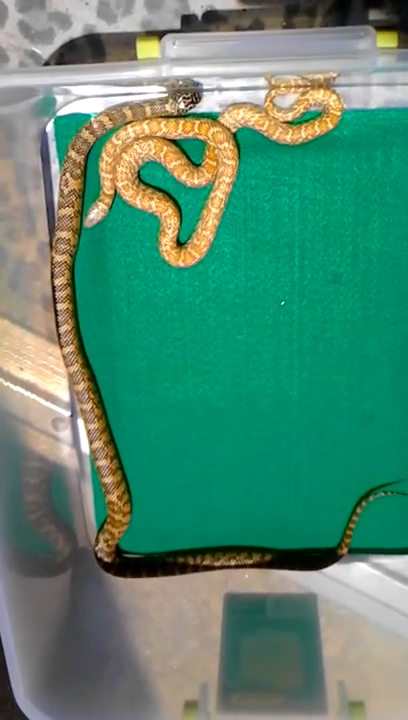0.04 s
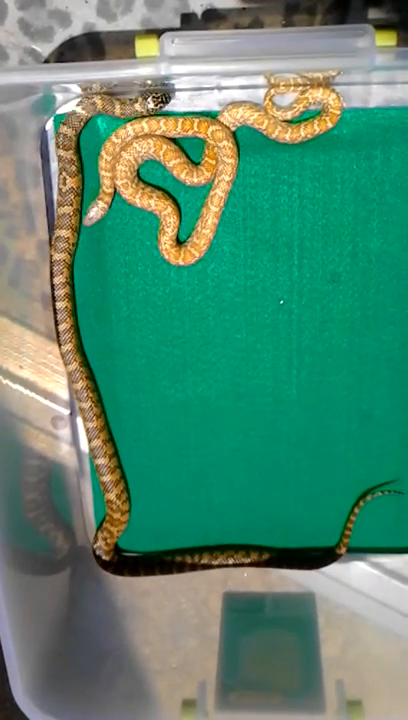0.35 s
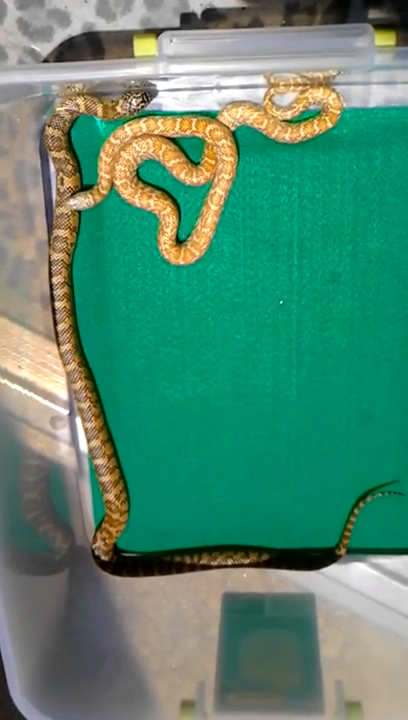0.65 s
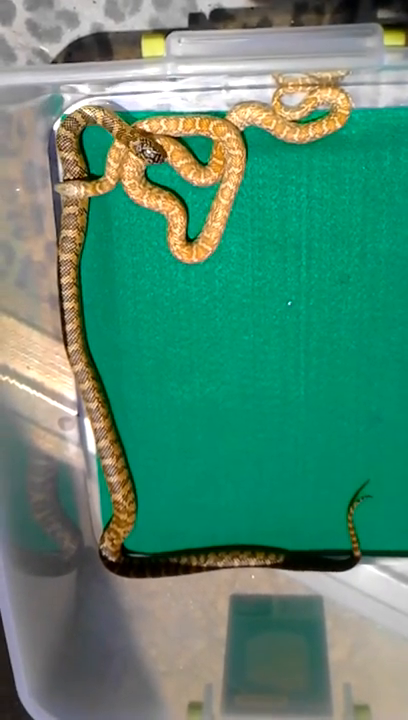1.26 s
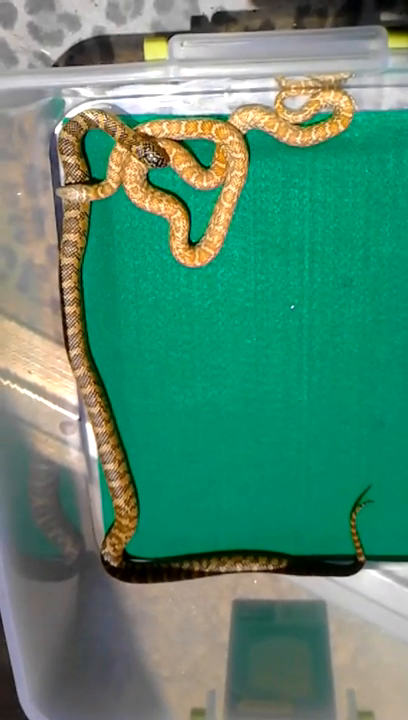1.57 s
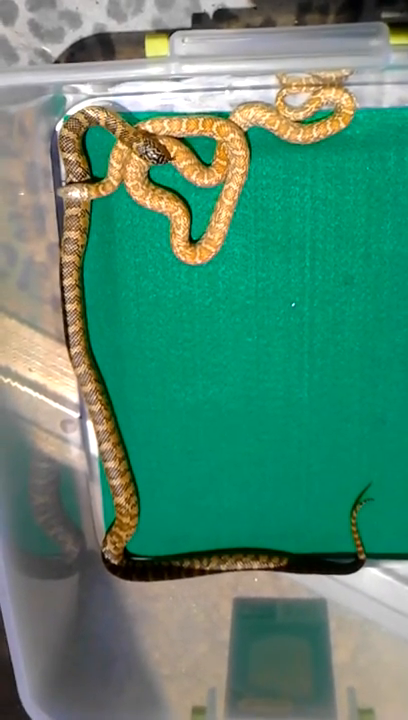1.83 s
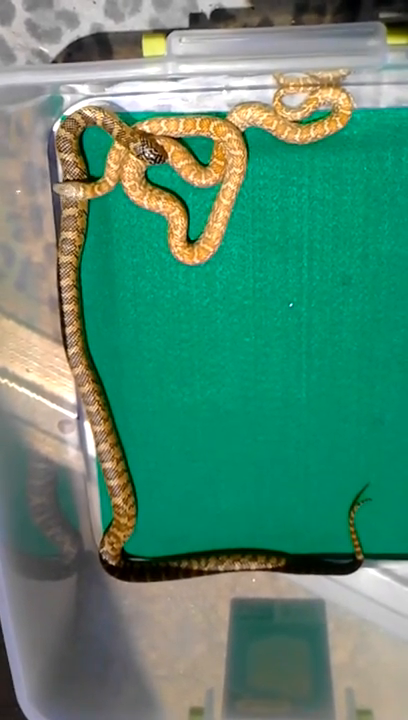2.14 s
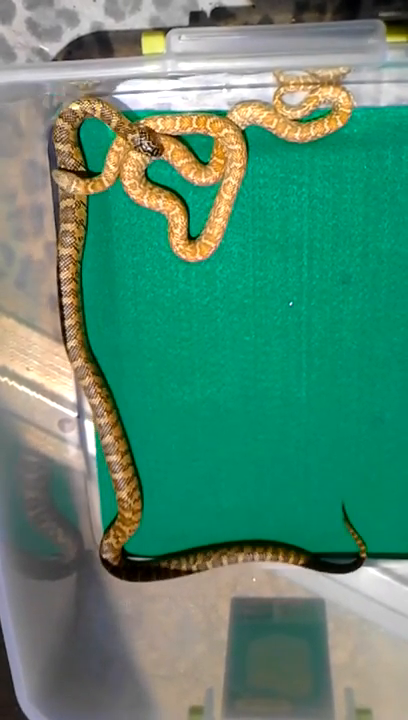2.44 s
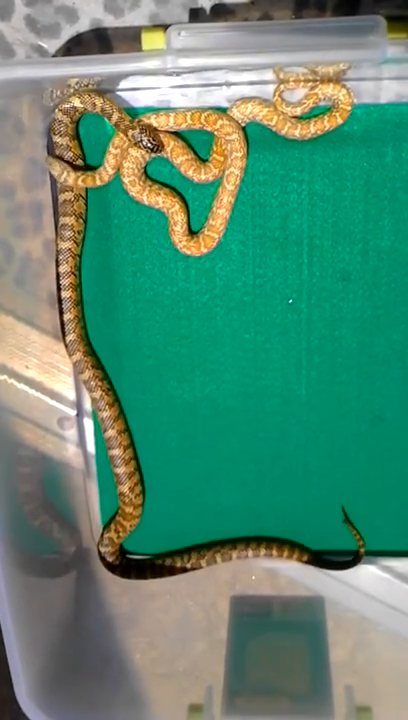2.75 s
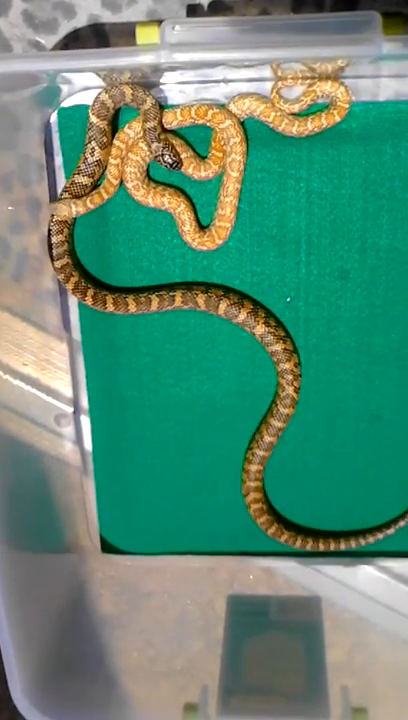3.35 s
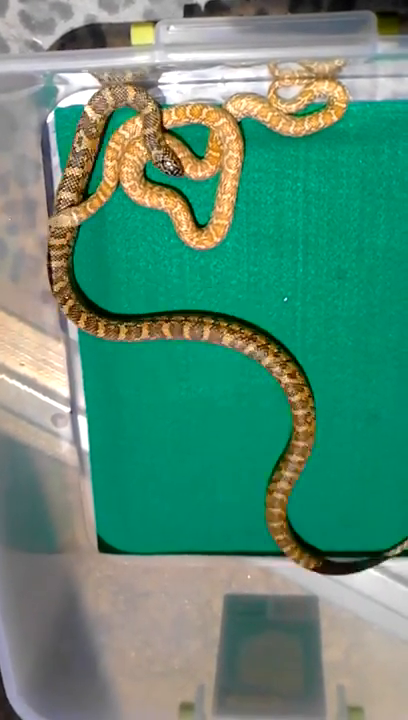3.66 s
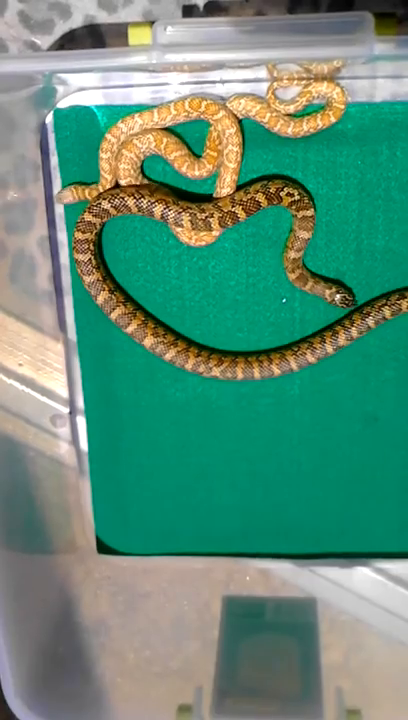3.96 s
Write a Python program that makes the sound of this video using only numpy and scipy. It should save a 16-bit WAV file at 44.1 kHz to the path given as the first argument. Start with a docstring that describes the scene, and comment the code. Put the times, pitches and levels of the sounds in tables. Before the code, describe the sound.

A snake's tail buzzing against a plastic tub is the main sound. For the first two seconds there is only a thin, pulsing, insect-like hiss with faint high chirps, over low motor hum and room noise. Scales slide faintly around 2 seconds, and uneven light slaps follow. From 2.5 seconds the tail keeps up a fast, dry buzz, with one dull knock on the tub at about 3.9 seconds.

```python
"""Snake buzzing its tail in a tub

One microphone by a plastic tub in a quiet room. Scales slide, a few uneven slaps follow, then the tail
tip slaps and scrapes the plastic some 58 times a second, a dry buzz. Near the end the snake knocks
against the tub once. Behind it are a thin, pulsing, insect-like hiss with faint high chirps,
a low motor hum, room noise and a slight electronic whine."""
import sys
import numpy as np
from scipy import signal
from scipy.fft import rfft, irfft
from scipy.io import wavfile

SR = 44100
rng = np.random.default_rng(int(sys.argv[2]) if len(sys.argv) > 2 else 0)


def transcribe(signal):
    """Save signal, clipped to [-1, 1], as a 16-bit WAV file at the path in sys.argv[1]."""
    frames = np.atleast_2d(signal).T
    limited = np.clip(frames, -1, 1)
    pcm = np.round(limited * 32767).astype(np.int16)
    wavfile.write(sys.argv[1], SR, pcm)


N = 176400

# first uneven slaps, before the tail finds its rhythm: start_s, level_db
FIRST_SLAPS = [(2.216, -81), (2.235, -68), (2.247, -65.5), (2.256, -74.5), (2.267, -65.5), (2.287, -66),
               (2.299, -68.5), (2.311, -70), (2.3379, -63.5), (2.348, -64), (2.3677, -65.5), (2.381, -66.5),
               (2.3995, -66), (2.411, -70), (2.426, -70), (2.44, -73), (2.4531, -65), (2.471, -65.5)]
# speed of the tail: time_s, beats_per_s
BEAT_RATE = [(2.49, 57.3), (2.68, 57.25), (2.8, 57.62), (3.27, 57.88), (3.36, 58.9), (3.47, 57.6),
             (3.65, 57.96)]
# force of the steady beats on the plastic: time_s, level_db
BEAT_FORCE = [(2.49, -63.5), (2.51, -64), (2.53, -67), (2.56, -66.5), (2.7, -65.5), (3.04, -65.5),
              (3.066, -69), (3.083, -68), (3.11, -65), (3.2, -66), (3.36, -66), (3.385, -69.5), (3.47, -71),
              (3.56, -68.5), (3.9, -69), (3.95, -68.5)]
# contacts within one beat: delay_s, relative_db, decay_s, accent_hz
BEAT_CONTACTS = [(0.0, 0, .0012, 3800), (.0034, -1.5, .0012, 4000), (.0054, 0, .0017, 5700),
                 (.0082, -3.5, .003, 2400)]
# resonances of the tub: pitch_hz, width_hz, relative_db
TUB_MODES = [(404, 14, 5), (570, 50, 8.5), (640, 50, 1), (877, 40, -1), (1095, 55, 0), (1588, 50, -2.5),
             (2196, 50, 4), (2449, 55, 3.5), (2955, 20, -2.5), (3127, 25, -1), (3655, 30, -2),
             (3768, 25, 3), (3940, 20, 1.5), (4172, 20, -.5), (4338, 30, -.5), (4818, 22, -2),
             (5178, 70, -1), (5474, 90, -1), (5700, 35, 4), (6971, 120, -4), (7920, 90, -2), (8134, 60, -3),
             (8301, 70, -2)]
# colour of the scrape: frequency_hz, relative_db
SCRAPE_COLOUR = [(200, -3), (400, 3), (560, -2), (1100, 1), (1450, 1), (2300, -3), (2650, -4), (3300, -2.5),
                 (4100, 0), (4750, -6), (5300, -1), (6900, 0.5), (7550, -9), (8200, 1), (9200, -5.5),
                 (10400, -7.5), (11500, -16), (15000, -42)]
def tail_buzz(buzz_start_s=2.4921):
    """In front: each beat is a few short scrapes, partly alike every time, that ring the tub."""
    beat_spread_db, contact_spread_db, jitter_s = .6, .65, .00008
    friction_db, rub_into_tub_db, accent_db = -11, 2, -.5
    scrape_db, ring_db = -.5, -.8
    t = seconds()
    rate = in_time(BEAT_RATE)
    cycles = np.cumsum(rate * (t > buzz_start_s)) / SR
    steady_s = t[1:][np.diff(np.ceil(cycles)) > 0]
    steady_db = np.interp(steady_s, *np.transpose(BEAT_FORCE))
    steady_db += beat_spread_db * rng.standard_normal(len(steady_s))
    beat_s, beat_db = np.hstack([np.transpose(FIRST_SLAPS), [steady_s, steady_db]])
    rubbing, scrapes = np.zeros((2, N))
    for delay_s, db, decay_s, accent_hz in BEAT_CONTACTS:
        late, strong = rng.standard_normal((len(beat_s), 2)).T
        onsets = ((beat_s + delay_s + jitter_s * late) * SR).astype(int)
        touches = np.bincount(onsets, from_db(db + beat_db + contact_spread_db * strong), N)[:N]
        fade = np.exp(-t[:SR // 20] / decay_s)
        alike = signal.fftconvolve(touches, scuff(decay_s), "same")
        fresh = signal.fftconvolve(touches, fade / np.linalg.norm(fade))[:N] * rng.standard_normal(N)
        contact = alike + from_db(friction_db) * fresh
        rubbing += touches + from_db(rub_into_tub_db) * fresh
        scrapes += contact + from_db(accent_db) * resonate(contact, accent_hz, width_hz=1700)
    ringing = sum((-1) ** k * from_db(db) * resonate(rubbing, hz, width_hz)
                  for k, (hz, width_hz, db) in enumerate(TUB_MODES))
    scrape = tub_walls(coloured(scrapes, SCRAPE_COLOUR))
    level = np.sqrt(np.sum(from_db(beat_db) ** 2) / np.sum(rate / SR))
    return level * (from_db(scrape_db) * scrape + from_db(ring_db) * rms_one(ringing))


def scuff(decay_s):
    """One short scrape of unit energy and flat spectrum, starting in the middle of the array."""
    age = np.arange(-SR // 20, SR // 20) / SR
    burst = (age >= 0) * np.exp(-np.abs(age) / decay_s) * rng.standard_normal(len(age))
    phase = np.angle(rfft(burst))
    return irfft(np.exp(1j * phase), len(age))


def tub_walls(x, echo_db=-7, t60_s=.06):
    """Add dense, quickly dying reflections between the walls of the tub; rms 1."""
    t = seconds()[:SR // 4]
    echoes = rng.standard_normal(len(t)) * from_db(-60 * t / t60_s)
    reflected = signal.fftconvolve(x, echoes / np.linalg.norm(echoes))[:N]
    return rms_one(x + from_db(echo_db) * reflected)


# what rings when the tub is knocked: pitch_hz, relative_db, t60_s
BUMP_MODES = [(314, -10, 0.041), (572, -11, 0.055), (696, 0.5, 0.03), (1010, -7, 0.018),
              (1370, -8.5, 0.034), (1980, -23, 0.029)]
def knock(bump_s=3.9325, bump_db=-46, tick_s=3.9465, tick_db=-52.5, tick_decay_s=.0012):
    """At the tub wall: a dull bump on the plastic, then a tiny bright tick."""
    age = np.maximum(seconds() - bump_s, 0)
    bump = sum(from_db(bump_db + db - 60 * age / t60_s) * np.sin(2 * np.pi * hz * age)
               for hz, db, t60_s in BUMP_MODES)
    age = seconds() - tick_s
    tick = from_db(tick_db) * (age > 0) * np.exp(-np.abs(age) / tick_decay_s) * rng.standard_normal(N)
    highpass = signal.butter(2, 3500, "high", fs=SR, output="sos")
    return bump + signal.sosfilt(highpass, tick + 1e-18)


# swell of the sliding scales: time_s, level_db
SCALES_LEVEL = [(1.8, -110), (1.9, -84.5), (2.2, -80), (2.3, -110)]
# their colour: frequency_hz, relative_db
SCALES_COLOUR = [(1200, -7.5), (1750, 3), (2300, -12.5), (2750, -5.5), (3500, -15), (5000, -39)]
def sliding_scales(grain_db=2):
    """Inside the tub: scales rub faintly and unevenly on the plastic just before the buzz."""
    rub = rng.standard_normal(N) * from_db(grain_db * drift(rate_hz=60))
    return from_db(in_time(SCALES_LEVEL)) * coloured(rub, SCALES_COLOUR)


# spurts of the thin hiss: centre_s, length_s, level_db
HISS_SPURTS = [(0.029, 0.023, -70), (.057, 0.013, -71.5), (.095, .02, -78), (0.133, .025, -72),
               (0.178, 0.026, -72), (.228, 0.061, -74.5), (.287, 0.018, -73), (0.325, 0.016, -72),
               (0.373, .038, -71.5), (0.407, .02, -72), (.46, 0.061, -72.5), (0.533, .052, -74),
               (0.606, 0.058, -73.5), (0.695, 0.12, -74.5), (0.78, 0.017, -79), (0.796, 0.016, -75),
               (0.821, 0.017, -72), (0.855, .03, -74), (.893, 0.037, -75), (0.956, 0.058, -73.5),
               (1.006, 0.025, -74), (1.047, 0.01, -70.5), (1.081, 0.017, -73.5), (1.121, 0.013, -73),
               (1.158, 0.01, -73), (1.201, .025, -74.5), (1.248, .025, -78), (1.32, 0.02, -73),
               (1.437, 0.028, -80), (1.485, .03, -78), (1.643, 0.017, -76), (1.697, .014, -75),
               (1.75, 0.016, -77), (1.802, 0.013, -75), (1.881, 0.015, -73.5), (1.936, 0.06, -73.5),
               (2.003, 0.017, -70.5), (2.044, 0.016, -69), (2.112, 0.11, -74), (2.189, 0.028, -73)]
# its colour: frequency_hz, relative_db
HISS_COLOUR = [(4300, -30), (5000, -11), (5650, 1.5), (6750, 3.5), (7200, -1), (7800, -27.5), (10000, -19),
               (13000, -51)]
def pulsing_hiss(ramp_s=.006, bed_db=-80, flicker_db=1.2):
    """Behind the snake: a narrow insect-like hiss in uneven, flat-topped spurts over a faint bed."""
    t = seconds()
    spurts = sum(from_db(db) * np.clip(.5 + (length_s / 2 - np.abs(t - centre_s)) / ramp_s, 0, 1)
                 for centre_s, length_s, db in HISS_SPURTS)
    flicker = from_db(flicker_db * drift(rate_hz=55))
    level = np.hypot(spurts, from_db(bed_db)) * flicker
    return level * coloured(rng.standard_normal(N), HISS_COLOUR)


# faint high chirps: centre_s, level_db
CHIRP_PIPS = [(.076, -82), (.116, -87), (.233, -79), (.352, -80), (.457, -76), (.5, -74), (.575, -74),
              (.726, -82), (1.03, -75.5), (1.107, -85), (1.338, -73), (1.485, -72), (1.525, -84),
              (1.566, -81), (1.598, -82), (1.639, -80), (1.676, -81), (1.716, -81), (1.787, -75),
              (1.827, -76), (1.865, -76), (2.168, -73)]
def chirps(pitch_hz=8920, wander_hz=100, width_s=.007):
    """In the background: short, soft-edged pips of one unsteady high tone."""
    t = seconds()
    swell = sum(from_db(db) * np.exp(-.5 * ((t - centre_s) / width_s) ** 2)
                for centre_s, db in CHIRP_PIPS)
    hz = pitch_hz + wander_hz * drift(rate_hz=110)
    return swell * np.sin(2 * np.pi * np.cumsum(hz) / SR)


# motor hum: pitch_hz, level_db
MOTOR_TONES = [(58.7, -55), (117.4, -73)]
# electronic whine: pitch_hz, level_db
WHINE_TONES = [(5000, -94.5), (6000, -86), (8000, -89.5), (10000, -86.5), (11000, -99), (12000, -93),
               (14000, -103)]
def hum_and_whine():
    """Steady tones in the background: a motor low down, electronics high up."""
    return sum(np.sqrt(2) * from_db(db) * np.sin(2 * np.pi * (hz * seconds() + rng.random()))
               for hz, db in MOTOR_TONES + WHINE_TONES)


# colour of the room noise: frequency_hz, relative_db
ROOM_COLOUR = [(20, -1), (45, -0.5), (75, -7), (105, -8), (150, -14), (230, -23.5), (420, -27.5),
               (650, -23.5), (1050, -28), (1500, -40.5), (2200, -47.5), (4200, -51.5), (8000, -52)]
# colour of the smooth high hiss: frequency_hz, relative_db
HIGH_HISS_COLOUR = [(4400, -23), (5200, -3), (6500, -11.5), (7700, -6), (9100, -3), (9700, 0.5), (10600, 1),
                    (11400, -9), (12100, -1.5), (13000, -7), (14000, -9), (15000, -26)]
# its slow rise and fall: time_s, level_db
HIGH_HISS_LEVEL = [(0, -76.5), (1.25, -77.5), (1.4, -76), (2.6, -76), (3.0, -80), (3.4, -75.5), (4, -77.5)]
def room_tone(room_db=-57):
    """The room around the microphone: quiet low noise under a smooth high hiss."""
    low, high = rng.standard_normal((2, N))
    hiss = from_db(in_time(HIGH_HISS_LEVEL)) * coloured(high, HIGH_HISS_COLOUR)
    return from_db(room_db) * coloured(low, ROOM_COLOUR) + hiss


def from_db(db):
    """Decibels to gain."""
    return 10 ** (np.asarray(db) / 20)


def rms_one(x):
    """Scale to unit power."""
    return x / np.sqrt(np.mean(x ** 2) + 1e-20)


def seconds():
    """Time of every sample."""
    return np.arange(N) / SR


def in_time(rows):
    """Join (time_s, value) rows with straight lines."""
    return np.interp(seconds(), *np.transpose(rows))


def coloured(x, spectrum):
    """Give a sound the colour of (frequency_hz, relative_db) rows; rms 1."""
    hz, db = np.transpose(spectrum)
    bin_hz = np.maximum(np.arange(N // 2 + 1) * SR / N, 1)
    gain = from_db(np.interp(np.log(bin_hz), np.log(hz), db))
    return rms_one(irfft(rfft(x) * gain, N))


def drift(rate_hz):
    """Smooth random motion of spread 1."""
    r = np.exp(-2 * np.pi * rate_hz / SR)
    return rms_one(signal.lfilter([1], [1, -2 * r, r * r], rng.standard_normal(N + SR))[SR:])


def resonate(x, hz, width_hz):
    """A resonance with gain 1 at its peak."""
    r = np.exp(-np.pi * width_hz / SR)
    feedback = [1, -2 * r * np.cos(2 * np.pi * hz / SR), r * r]
    return signal.lfilter(np.array([1, 0, -1]) * (1 - r * r) / 2, feedback, x)


def scene():
    """The snake and the room behind it, at one microphone."""
    snake = tail_buzz() + sliding_scales() + knock()
    background = pulsing_hiss() + chirps() + hum_and_whine() + room_tone()
    return (snake + background)[None]


def record(dry):
    """The microphone signal loses its top steeply and rides on a constant offset."""
    cutoff_hz, offset = 15000, -.033
    lowpass = signal.ellip(10, .1, 70, cutoff_hz, fs=SR, output="sos")
    return offset + signal.sosfilt(lowpass, dry)


dry = scene()
out = record(dry)
transcribe(out)
```